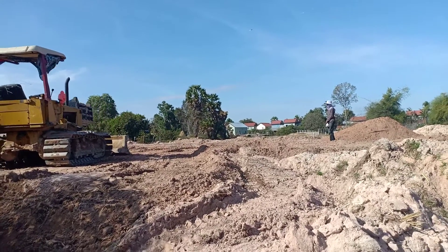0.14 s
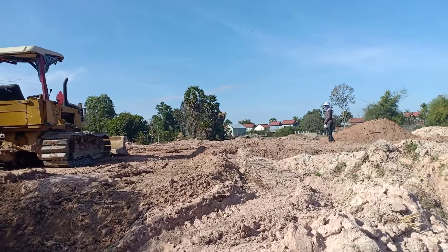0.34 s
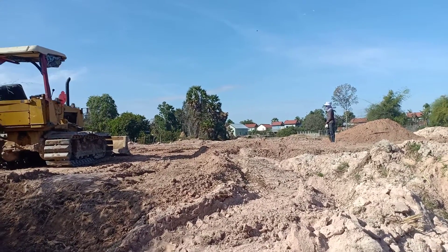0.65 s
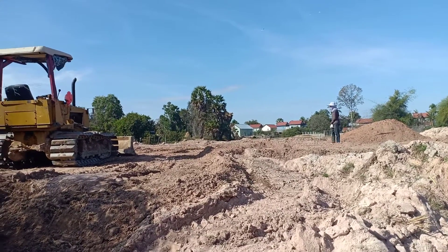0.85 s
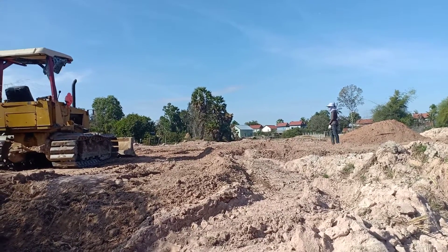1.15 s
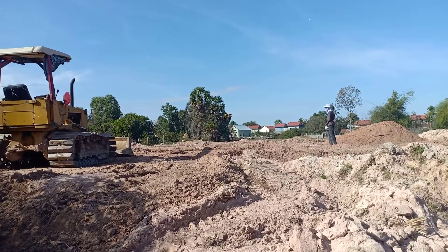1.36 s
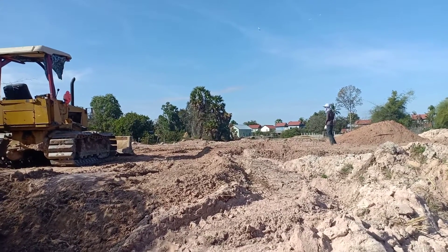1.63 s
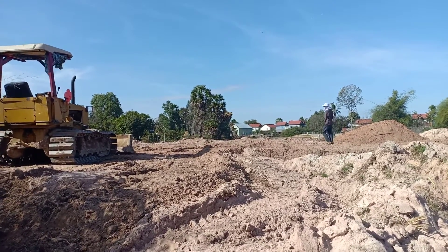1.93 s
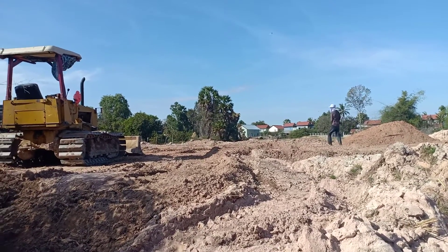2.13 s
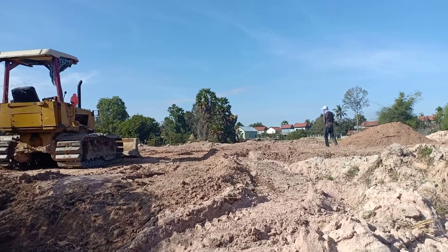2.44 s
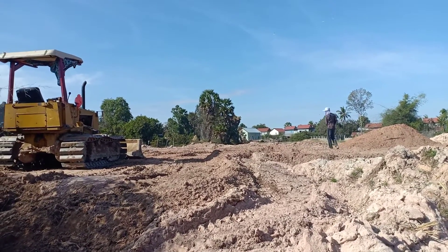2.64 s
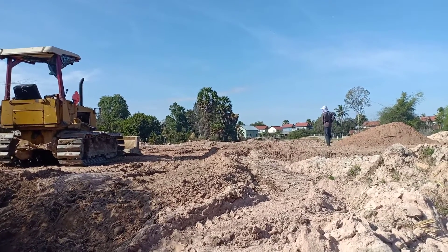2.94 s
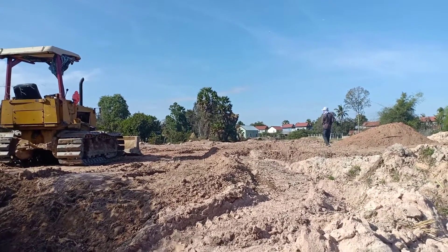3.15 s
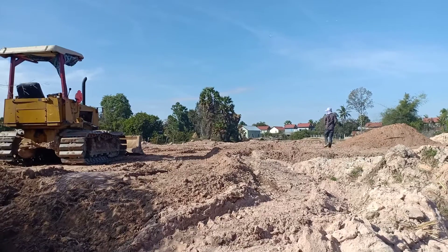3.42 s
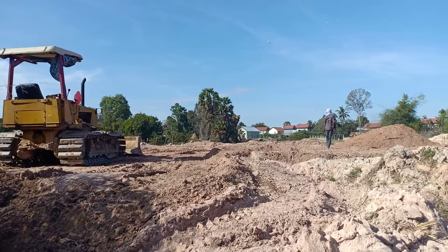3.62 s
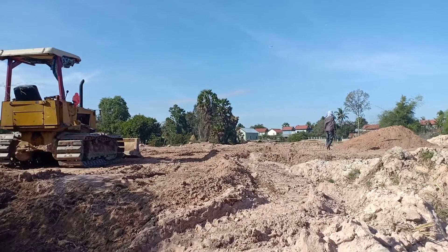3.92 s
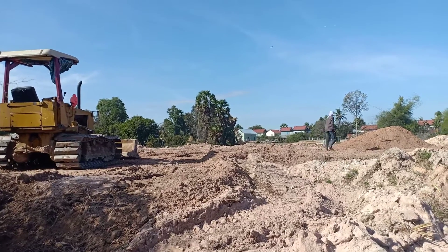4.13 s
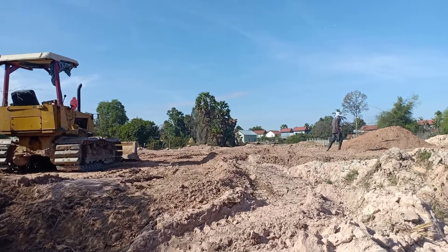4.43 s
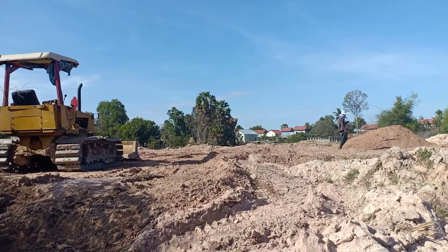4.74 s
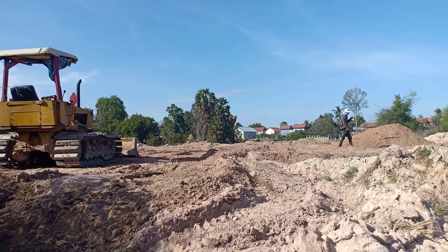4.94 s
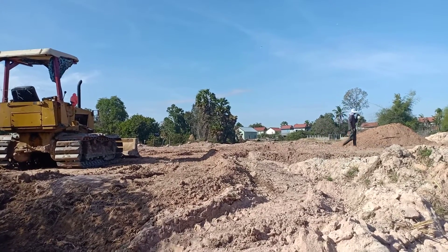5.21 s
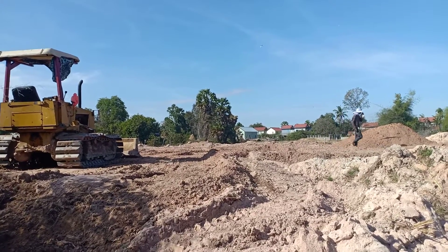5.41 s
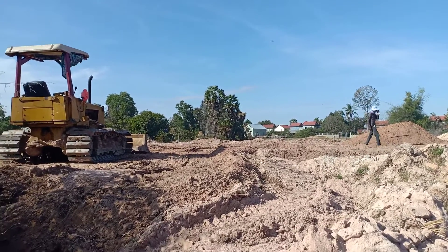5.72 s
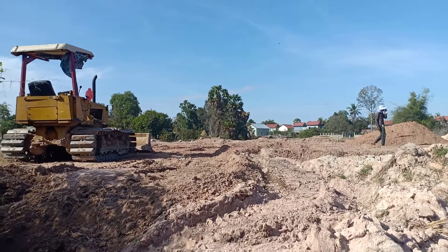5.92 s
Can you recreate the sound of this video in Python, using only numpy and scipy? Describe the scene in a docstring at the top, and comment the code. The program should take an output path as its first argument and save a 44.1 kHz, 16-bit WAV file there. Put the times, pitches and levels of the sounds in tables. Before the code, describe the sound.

Gusty wind rumbles on the microphone over a creeping bulldozer's rattling diesel, clinking metal tracks, brief squeaks and a sudden hiss.

```python
"""From the start a small tracked bulldozer creeps over dirt some way off: its idling diesel clatters, a
cover taps once a cycle and steel links clank, while gusts buffet a phone's two microphone ports, each in
its own way, and drown the bass. Sliding metal squeals in the first two seconds; dry track pins chatter,
loudest near 2.7 s. Just after 4 s the hardest gust rings the right port, then one long hiss bursts out
and leaks away. Lower squeals follow as the tracks clank on."""
import sys
import numpy as np
from scipy.fft import rfft, irfft, next_fast_len
from scipy.io import wavfile
from scipy.ndimage import map_coordinates

SR = 44100
rng = np.random.default_rng(int(sys.argv[2]) if len(sys.argv) > 2 else 0)


def master_out(mix):
    """Clip the mix to full scale and print it as 16-bit PCM to the path in sys.argv[1]."""
    frames = np.transpose(np.atleast_2d(mix))
    ceiling = np.clip(frames, -1, 1)
    pcm = np.round(ceiling * 32767).astype(np.int16)
    wavfile.write(sys.argv[1], SR, pcm)


N = 267731

# machine drive: t/s, engine level/dB, grind level/dB, pin level/dB (all relative)
MACHINE_LEVELS = [(0.0, -49, -49, -52), (0.3, -50, -50.5, -59), (0.75, -49.5, -49, -57),
                  (1.0, -47.5, -47.5, -47), (1.3, -48.5, -47.5, -45), (1.7, -47.5, -47.5, -43.5),
                  (1.98, -44.5, -44, -43), (2.5, -45, -47, -38.5), (2.75, -45, -46, -37),
                  (3.0, -45, -47.5, -41), (3.4, -45.5, -44, -42), (3.9, -46, -48.5, -42.5),
                  (4.3, -46, -48.5, -42.5), (4.9, -47, -48.5, -43.5), (5.2, -45.5, -48, -43.5),
                  (5.46, -47.5, -49, -44.5), (5.71, -46, -49, -44), (6.07, -46.5, -46, -51)]
# engine block spectrum: f/Hz, level/dB
BLOCK_SPECTRUM = [(300, -14), (700, 2), (1100, -1), (1290, -4), (1560, 1.5), (1760, -1), (2100, 3),
                  (2750, -1.5), (3200, -6.5), (3550, -10.5), (4200, -15.5), (6000, -38), (8000, -59)]
# two knocks per cylinder: delay from tap/cycles, relative level/dB
CYLINDER_KNOCKS = [(0.0, 2.5), (.085, 4.5), (.255, 0.5), (.335, 1.5), (.49, -12), (.57, -1.5), (.76, -2),
                   (.84, 3)]
# loose cover modes: f/Hz, level/dB, t60/s
COVER_MODES = [(2130, 0, 0.1), (1903, -2, 0.08), (1730, -11, 0.032), (2550, -13, 0.055)]
def engine():
    """Firings swell the block's clatter; a tap rings the cover and rebounds. Returns sound and beat."""
    first_tap_s, cycle_s, tap_over_engine_db = 0.0575, 0.15023, 16.5
    level_db = curves(MACHINE_LEVELS)[0]
    tap_s = first_tap_s + cycle_s * np.arange(40)
    tap_db = level_db[(tap_s * SR).astype(int)] + tap_over_engine_db + 2 * rng.standard_normal(len(tap_s))
    delay_cycles, cylinder_db = np.transpose(CYLINDER_KNOCKS)
    knock_s = np.concatenate([tap_s + delay * cycle_s for delay in delay_cycles])
    knock_db = np.repeat(cylinder_db, len(tap_s)) + 1.2 * rng.standard_normal(len(knock_s))
    beat = np.hypot(1, blows(knock_s, knock_db + 2.5, t60_s=0.022, attack_s=0.0022))
    clatter = unit(beat * amp(1.36 * wobble(25)) * noise(BLOCK_SPECTRUM, channels=2))
    taps = struck(np.append(tap_s, tap_s + 0.06), np.append(tap_db, tap_db - 6.5),
                  COVER_MODES, spread_db=0.5)
    return amp(level_db + 8) * clatter + taps * [[1], [0.3]], beat


# track plate modes: f/Hz, level/dB, t60/s
PLATE_MODES = [(3680, -8.5, 0.062), (4190, -3.5, 0.056), (4340, -5.5, 0.07), (4406, -2, 0.11),
               (4785, 0, 0.073), (4984, 2, 0.098), (5200, -1, 0.072), (5230, -3, 0.037), (5500, -5, 0.046),
               (5684, 2, 0.063), (5740, -0.5, 0.038), (6440, -7, 0.04)]
def plate_noise(sharpness, flicker_db):
    """Steel noise sounds fitfully through each plate resonance."""
    out = 0
    for hz, db, t60_s in PLATE_MODES:
        flicker = amp(flicker_db * wobble(9))
        out += flicker * filtered(noise(STEEL_SPECTRUM, channels=2), modes([(hz, sharpness / t60_s, db)]))
    return unit(out)


# track steel spectrum at the microphone: f/Hz, level/dB
STEEL_SPECTRUM = [(2000, -19), (3400, -3.5), (4200, -0.5), (4600, -6), (5000, 0), (5800, -3), (6600, -11),
                  (7600, -18.5), (9100, -27.5), (9700, -33), (11200, -24.5), (13600, -24), (14150, -38),
                  (14700, -29), (15400, -45)]
def track_grind(beat):
    """Links grind steadily, shaken by the firings."""
    shake = beat ** 1.64 * amp(0.9 * wobble(14) + 1.96 * wobble(60))
    steel = noise(STEEL_SPECTRUM, channels=2) + 0.74 * plate_noise(sharpness=6.5, flicker_db=3.5)
    return amp(curves(MACHINE_LEVELS)[1] + 5) * unit(shake * steel)


# link landings: t/s, relative level/dB, t60/s, f/Hz
LINK_CLANKS = [(0.0553, -33, 0.045, 4180), (0.1101, -33, 0.11, 5000), (0.1486, -32, 0.074, 4980),
               (0.259, -28, 0.13, 4560), (0.4025, -37, 0.14, 5450), (0.5267, -33, 0.12, 4880),
               (0.8644, -39, 0.11, 5060), (0.9727, -32.5, 0.13, 5230), (1.0026, -44, 0.073, 4920),
               (1.1493, -28, 0.12, 4140), (1.2196, -33, 0.12, 4130), (1.263, -32, 0.15, 5070),
               (1.4795, -35.5, 0.12, 5220), (1.5738, -27.5, 0.11, 5170), (1.6018, -39, 0.073, 4970),
               (1.6731, -31, 0.16, 4300), (1.7554, -35, 0.069, 4150), (1.8367, -27, 0.094, 4980),
               (1.9016, -30.5, 0.097, 5440), (2.0063, -29, 0.12, 4980), (2.1021, -32.5, 0.14, 5210),
               (2.137, -27, 0.14, 5730), (2.3436, -28, 0.2, 5670), (2.4369, -31, 0.14, 5200),
               (2.4743, -31.5, 0.065, 4420), (2.6125, -39, .12, 5080), (2.6584, -31.5, 0.16, 5000),
               (2.7402, -33, 0.21, 5080), (2.7677, -30, 0.2, 5100), (2.9083, -32, 0.14, 5040),
               (3.0584, -29.5, 0.11, 4930), (3.1368, -33, .08, 5800), (3.249, -31, 0.12, 4980),
               (3.3583, -28, 0.1, 5040), (3.372, -24.5, 0.11, 5340), (3.512, -32, 0.1, 5590),
               (3.5882, -36, 0.068, 5830), (3.638, -30, 0.085, 5670), (3.7309, -36, .08, 5470),
               (3.7723, -38, .08, 5700), (3.8272, -26.5, 0.1, 5100), (4.3545, -30, 0.18, 5800),
               (4.5974, -30.5, 0.22, 5000), (4.67, -31.5, 0.12, 5500), (4.8036, -30.5, 0.069, 5670),
               (4.8369, -23.5, 0.14, 5450), (4.8944, -33, 0.15, 5540), (5.048, -33, 0.071, 5460),
               (5.1412, -24, 0.088, 4980), (5.2091, -34, 0.074, 4990), (5.3632, -45, 0.096, 5010),
               (5.4101, -35, .08, 4980), (5.462, -39, 0.097, 4980), (5.7109, -34, 0.2, 5020),
               (5.7982, -35.5, 0.18, 5370), (5.911, -31, 0.076, 5700), (6.047, -26.5, 0.16, 5060)]
# landing spectrum: f/Hz, level/dB
CRASH_SPECTRUM = [(2000, -0.5), (3400, -3), (4300, -9), (5000, -3), (5800, -3), (6600, -4), (7600, -12.5),
                  (9700, -26), (11500, -21), (13600, -31), (14200, -28), (15400, -40)]
def track_clanks():
    """A link lands in a broad crash and bounces, favouring the plate modes near its pitch."""
    favour_db, favour_width_hz, bounce_loss_db_per_s = 7, 210, 230
    times_s, levels_db, t60_s, pitches_hz = np.transpose(LINK_CLANKS)
    metal = unit(noise(CRASH_SPECTRUM, channels=2) + 1.34 * plate_noise(sharpness=4.7, flicker_db=3))
    envelope = blows(times_s, levels_db, t60_s, attack_s=0.0036)
    crash = amp(-2 + 1.4 * wobble(70)) * envelope * metal
    rattle = np.zeros(N)
    for start_s, level_db, pitch_hz in zip(times_s, levels_db, pitches_hz):
        favoured = [(hz, db + favour_db * np.exp(-((hz - pitch_hz) / favour_width_hz) ** 2), ring_s)
                    for hz, db, ring_s in PLATE_MODES]
        bounce_s = np.append(0, rng.uniform(0, 0.03, 4))
        bounce_db = level_db - 19.5 - bounce_loss_db_per_s * bounce_s
        rattle += struck(start_s + bounce_s, bounce_db, favoured, spread_db=4)
    return crash + rattle * [[1], [0.3]]


# frame knocks: t/s, level/dB
FRAME_KNOCKS = [(0.052, -28), (.07, -30), (0.541, -29), (5.468, -35), (5.765, -44)]
# frame spectrum: f/Hz, level/dB
FRAME_SPECTRUM = [(500, -30), (850, 6.5), (1200, 4.5), (1700, -3), (2400, -23), (3500, -51)]
def frame_thuds():
    """Dull knocks of the frame."""
    times_s, levels_db = np.transpose(FRAME_KNOCKS)
    return blows(times_s, levels_db, t60_s=0.079, attack_s=0.00083) * noise(FRAME_SPECTRUM, channels=2)


# track pin resonances, applied twice: f/Hz, width/Hz, level/dB
PIN_MODES = [(2295, 190, -5.5), (2537, 130, 0), (2753, 60, -2)]
def pin_chatter():
    """Dry pins slip at a steady rate, every second slip stronger; heard mostly on the right."""
    slip_hz, depth_db, alternate_db = 57.6, 8, 2
    phase = 2 * np.pi * slip_hz * np.arange(N) / SR + 0.44 * wobble(5.5)
    pulse_db = depth_db * np.cos(phase) + alternate_db * np.cos(phase / 2)
    slips = amp(pulse_db + 0.8 * wobble(130) + 0.9 * wobble(14)) * rng.standard_normal((2, N))
    ringing = unit(filtered(slips, lambda hz: modes(PIN_MODES)(hz) ** 2))
    common, right_only = amp(curves(MACHINE_LEVELS)[2]) * ringing
    return np.array([amp(-25.5) * common, amp(1) * (0.63 * common + 0.52 * right_only)])


# metal squeals: t/s, length/s, f/Hz, level/dB
METAL_SQUEALS = [(0.662, 0.16, 4240, -54), (.97, 0.059, 3540, -50), (0.996, .05, 4200, -50),
                 (1.07, .06, 4200, -47), (1.142, 0.13, 4140, -45), (1.72, 0.16, 4220, -51),
                 (1.902, 0.12, 4300, -47.5), (4.58, 0.18, 2750, -52), (5.099, 0.13, 2735, -47),
                 (5.57, 0.36, 2770, -52), (5.976, .09, 2700, -51)]
def squeals():
    """Metal sliding on metal gives short, unsteady whistles."""
    out = np.zeros(N + SR)
    for start_s, length_s, hz, db in METAL_SQUEALS:
        t = np.arange(round(length_s * SR)) / SR
        swell = np.abs(np.sin(np.pi * t / length_s)) ** 0.28 * amp(db + 1.3 * wobble(44, size=len(t)))
        whistle = np.sin(2 * np.pi * hz * t + 0.55 * wobble(70, size=len(t)))
        out[round(start_s * SR):][:len(t)] += swell * whistle
    return out[:N]


# hiss spectrum: f/Hz, level/dB
HISS_SPECTRUM = [(1500, -24), (2100, -4), (2800, -4), (3700, -8), (4600, -10.5), (5700, 5.5), (6200, 1.5),
                 (6800, -12.5), (8800, -17), (9900, -40), (11300, -19), (13500, -17), (14200, -28),
                 (15000, -38), (15400, -63)]
def hiss():
    """A sudden jet holds briefly and drops; a weaker stream leaks on."""
    start_s, attack_s, hold_s, level_db = 4.1235, 0.0014, 0.035, -19
    jet_fade_db_per_s, leak_fade_db_per_s = 199, 83
    t = np.clip(np.arange(N) / SR - start_s, 0, None)
    fading_s = np.clip(t - hold_s, 0, None)
    jet = amp(-jet_fade_db_per_s * fading_s)
    leak = amp(-8 - leak_fade_db_per_s * fading_s)
    envelope = (1 - np.exp(-t / attack_s)) ** 2 * np.hypot(jet, leak)
    return envelope * amp(level_db + 1.2 * wobble(110)) * noise(HISS_SPECTRUM, channels=2)


# machine, right port against left: f/Hz, level/dB
MACHINE_RIGHT_GAIN = [(800, 0), (2600, -1.5), (4400, -0.5), (5000, -3.5), (6000, -11.5), (7500, -2.5),
                      (12000, -4.5), (14000, 1), (15200, 3)]
# hiss, right port against left: f/Hz, level/dB
HISS_RIGHT_GAIN = [(2000, -4.5), (3500, 1), (4800, -5), (5700, -14), (7000, -8), (8800, -2), (11000, -3),
                   (13200, -12), (14300, 4)]
# likeness of the ports: f/Hz, coherence
PORT_COHERENCE = [(800, 0.98), (2100, 0.73), (2700, 0.4), (4500, 0.93), (5600, 0.46), (7000, 0.54),
                  (14000, 0.28)]
# lead of the right port: f/Hz, lead/ms
RIGHT_LEAD = [(1000, 0.2), (2400, 0.2), (3000, .16), (4600, 0.17), (5500, 0.14), (7000, 0.17),
              (9000, 0.201)]
def at_ports(pair, right_gain):
    """The left port hears pair[0]; the right hears it earlier, coloured and blended with pair[1]."""
    def right_path(hz):
        angle = np.arccos(np.clip(along(PORT_COHERENCE, hz), 0, 1))
        lead = np.exp(2j * np.pi * hz * along(RIGHT_LEAD, hz) / 1000)
        return amp(along(right_gain, hz)) * lead * [np.cos(angle), np.sin(angle)]
    return np.array([pair[0], filtered(pair, right_path).sum(axis=0)])


# wind on the left port: t/s, flutter level/dB, rumble level/dB (both relative)
GUSTS_LEFT = [(0.0, -25.5, -19.5), (0.12, -25, -23.5), (0.28, -22, -21.5), (0.36, -28, -19),
              (0.52, -24.5, -24.5), (0.6, -23.5, -20.5), (1.0, -29.5, -26), (1.28, -25, -25.5),
              (1.36, -30, -28), (1.52, -19, -20.5), (1.6, -21.5, -21), (1.7, -21.5, -17), (1.74, -21, -23),
              (1.84, -18.5, -24), (2.04, -25, -21), (2.2, -36, -30), (2.24, -25, -29), (2.32, -28, -24.5),
              (2.52, -24.5, -22.5), (2.6, -26.5, -24), (2.72, -28.5, -20), (2.8, -27, -20),
              (2.88, -33, -23.5), (2.92, -23.5, -17.5), (3.08, -31.5, -27.5), (3.16, -21, -21.5),
              (3.36, -21.5, -20), (3.48, -35.5, -32.5), (3.6, -27, -24.5), (3.72, -31, -26.5),
              (3.84, -25, -18.5), (3.92, -31, -26), (4.12, -25, -20.5), (4.28, -27, -23),
              (4.32, -30.5, -28), (4.56, -32.5, -27), (4.6, -28, -26), (4.72, -32.5, -28.5),
              (4.84, -24.5, -20), (5.0, -31.5, -31), (5.32, -32, -32.5), (5.4, -34, -34.5),
              (5.6, -28, -25.5), (5.68, -32, -30), (5.8, -21.5, -21), (5.84, -28, -23), (5.96, -25, -19),
              (6.07, -26.5, -28)]
# wind on the right port: t/s, flutter level/dB, rumble level/dB (both relative)
GUSTS_RIGHT = [(0.0, -29.5, -20), (0.12, -26, -19), (0.24, -30, -23.5), (0.52, -33.5, -29),
               (0.72, -30, -27), (0.76, -39, -32.5), (0.96, -33.5, -28), (1.04, -36, -31.5),
               (1.32, -35, -28), (1.44, -35, -32), (1.76, -32, -27), (1.84, -28, -23), (1.96, -33, -32.5),
               (2.56, -36, -29), (2.72, -35, -30.5), (2.84, -37, -31), (2.92, -26.0, -23), (3.08, -37, -34),
               (3.16, -25, -22), (3.32, -25.5, -25), (3.4, -33.5, -32), (3.48, -30.5, -36), (3.6, -37, -29),
               (3.68, -28.5, -27), (3.96, -36, -31), (4.04, -25.5, -25.5), (4.12, -20, -27),
               (4.16, -30, -29), (4.32, -28.5, -21.5), (4.44, -26, -24), (4.56, -32, -29.5),
               (4.72, -29.5, -26.5), (4.8, -33, -30), (4.92, -28, -33), (5.0, -38, -33.5), (5.16, -35, -32),
               (5.24, -30.5, -25.5), (5.36, -28, -25), (5.4, -29.5, -24), (5.56, -31, -26.5),
               (5.6, -34, -29), (5.72, -26, -22), (5.8, -31.5, -33), (5.88, -30, -21.5), (6.0, -32, -30),
               (6.07, -24.5, -16)]
# rumble spectrum: f/Hz, level/dB
RUMBLE_SPECTRUM = [(15, -70), (25, -48), (45, -26), (80, 0.5), (130, 5.5), (220, 1.5), (350, -10),
                   (600, -70.5)]
# flutter spectrum: f/Hz, level/dB
FLUTTER_SPECTRUM = [(150, -12), (280, -1), (450, -6.5), (700, -18), (1100, -27), (1700, -36.5), (3000, -63),
                    (6000, -120)]
def port_wind(gusts, spiky_db):
    """Eddies roll over a port as lumpy rumble and spikier flutter; strong flow brightens, then chokes."""
    swell_db, edge_hz, edge_width_hz, choke_amplitude = 0.64, 732, 500, 0.47
    flutter_db, rumble_db = np.array(curves(gusts)) + swell_db * np.array([wobble(12), wobble(11)])
    lumps = wobble(30) + 0.74 * wobble(80)
    rumble = unit(amp(1.92 * lumps) * noise(RUMBLE_SPECTRUM, channels=1)[0])
    flutter = unit(amp(1.05 * lumps + spiky_db * wobble(110)) * noise(FLUTTER_SPECTRUM, channels=1)[0])
    edge_db = -7.5 + 0.94 * (flutter_db + 30)
    edge = amp(edge_db) * filtered(flutter, modes([(edge_hz, edge_width_hz, 0)]))
    flow = amp(rumble_db + 1.5) * rumble + amp(flutter_db - 1.5) * (flutter + edge)
    return soft_limit(flow, choke_amplitude, hardness=4)


# loudest eddies: t/s, level/dB, f/Hz, port (0 left, 1 right)
LOUD_POPS = [(0.089, -22, 280, 1), (0.26, -20, 348, 1), (0.302, -10, 550, 1), (0.273, -2, 376, 0),
             (0.379, -5.5, 520, 0), (0.575, -6, 415, 0), (1.231, -3.5, 470, 0), (1.302, -2.5, 448, 0),
             (1.312, -9, 325, 1), (1.474, -7, 520, 0), (1.49, -6, 430, 0), (1.535, -4, 477, 0),
             (1.558, -6, 566, 0), (1.662, -6.5, 420, 0), (1.673, -6, 605, 0), (1.706, -2, 640, 0),
             (1.803, -5, 560, 0), (1.852, -6, 600, 0), (1.834, -9, 395, 1), (2.5, -5.5, 380, 0),
             (2.784, -8.5, 326, 0), (2.922, -1.5, 590, 1), (2.935, -5.5, 304, 0), (2.999, -3.5, 327, 0),
             (3.148, -2.5, 423, 0), (3.149, -4, 240, 1), (3.179, 1.5, 260, 1), (3.192, 0, 273, 1),
             (3.278, -1.5, 550, 0), (3.306, -2.5, 360, 0), (3.489, -8, 380, 1), (3.7, -2.5, 360, 1),
             (3.826, -7, 372, 0), (4.059, -1.5, 480, 1), (4.0745, 5, 430, 1), (4.092, -1, 810, 1),
             (4.254, -4.5, 320, 0), (4.311, -6, 426, 1), (4.458, -4.5, 370, 1), (4.611, -3.5, 246, 0),
             (4.727, -6.5, 358, 1), (4.841, -6, 350, 0), (5.216, -10, 406, 1), (5.226, -6, 300, 1),
             (5.289, -10, 332, 1), (5.296, -4, 337, 1), (5.438, -5.5, 297, 1), (5.527, -4, 500, 1),
             (5.553, -5.5, 593, 1), (5.583, -1.5, 316, 0), (5.673, -4.5, 357, 1), (5.728, -1, 625, 1),
             (5.79, -1, 390, 0), (5.951, -10, 307, 1), (5.955, 0, 282, 0)]
def eddy_pops():
    """An eddy bursts on a port: a blunt push of either sign with a few ragged cycles on top."""
    push_corner_hz, ring_cycles, stretch_per_db = 480, 8.96, 0.036
    out, t = np.zeros((2, N + SR)), np.arange(SR // 16) / SR
    rise = np.sin(np.pi / 2 * np.clip(t / 0.0027, 0, 1)) ** 2
    pops = np.vstack([LOUD_POPS, small_pops(GUSTS_LEFT, port=0, count=20),
                      small_pops(GUSTS_RIGHT, port=1, count=30)])
    for (start_s, db, hz, port), sign in zip(pops, rng.choice([-1, 1], len(pops))):
        cycles = np.sin(2 * np.pi * hz * t + 1.34 * wobble(203, size=len(t)))
        push = 1.42 * min(1, (push_corner_hz / hz) ** 3) * np.sin(np.pi * hz * t)  # octave below
        t60_s = np.clip(ring_cycles / hz * (1 + stretch_per_db * db), 0.01, 0.1)
        envelope = rise * amp(db - 60 * t / t60_s)
        out[round(port), round(start_s * SR):][:len(t)] += sign * envelope * (cycles + push)
    return out[:, :N]


def small_pops(gusts, port, count):
    """Pop rows for small eddies at random times, scaled by the wind on their port."""
    when, weakness, pitch = rng.uniform(size=(count, 3)).T
    wind_db = curves(gusts)[0][(when * (N - 1)).astype(int)]
    level_db = wind_db + 11.5 - 8 * weakness
    pitch_hz = 344 * 1.5 ** (pitch - 0.5)
    return np.transpose([when * N / SR, level_db, pitch_hz, np.full(count, port)])


# right port modes: f/Hz, level/dB, t60/s
PORT_MODES = [(214, -1.5, 0.052), (415, -12, .04), (606, 2, 0.07), (794, -7, 0.083), (1520, -17, 0.034)]
def port_thump():
    """The hardest gust sets the right port ringing."""
    return [[0], [1]] * struck(times_s=[4.0775], levels_db=[-2.5], table=PORT_MODES, spread_db=0)


# spectrum of the largest eddies: f/Hz, level/dB
SURGE_SPECTRUM = [(15, -70), (25, -42), (45, -5.5), (75, 2), (110, -2.5), (160, -19), (300, -70.5)]
def wind_surge():
    """The largest eddies cover both ports and follow their mean rumble level."""
    mean_db = (curves(GUSTS_LEFT)[1] + curves(GUSTS_RIGHT)[1]) / 2
    common, *separate = noise(SURGE_SPECTRUM, channels=3)
    return amp(mean_db - 5) * unit(0.5 * common + np.array(separate))


def struck(times_s, levels_db, table, spread_db):
    """Each blow rings the modes, slightly detuned, their levels scattered by spread_db."""
    out, t = np.zeros(N + SR), np.arange(SR // 8) / SR
    hz, mode_db, t60_s = np.transpose(table)[..., None]
    envelope = amp(mode_db - 60 * t / t60_s) * (1 - np.exp(-t / 0.00066))
    for start_s, db in zip(times_s, levels_db):
        scatter, detune = rng.standard_normal((2, len(table), 1))
        ring = amp(db + spread_db * scatter) * envelope * np.sin(2 * np.pi * hz * (1 + 0.0087 * detune) * t)
        out[round(start_s * SR):][:len(t)] += ring.sum(axis=0)
    return out[:N]


def blows(times_s, levels_db, t60_s, attack_s):
    """Envelope of decaying blows, summed in power."""
    power, t = np.zeros(N + SR), np.arange(SR // 6) / SR
    rise = (1 - np.exp(-t / attack_s)) ** 2
    for start_s, db, fade_s in np.broadcast(times_s, levels_db, t60_s):
        power[round(start_s * SR):][:len(t)] += amp(2 * db - 120 * t / fade_s) * rise
    return np.sqrt(power[:N])


def modes(table):
    """Causal response of resonances given as f/Hz, width/Hz, level/dB."""
    return lambda f: sum((-1) ** k * amp(db) * 1j * f * width / (hz * hz - f * f + 1j * f * width)
                         for k, (hz, width, db) in enumerate(table))


def noise(spectrum, channels):
    """Independent noises of one colour, rms 1."""
    return unit(filtered(rng.standard_normal((channels, N)), lambda hz: amp(along(spectrum, hz))))


def filtered(x, response):
    """Apply a complex frequency response."""
    size = next_fast_len(N + SR // 2)
    return irfft(rfft(x, size) * response(np.fft.rfftfreq(size, 1 / SR)), size)[..., :N]


def wobble(rate_hz, size=N):
    """Smooth random curve with knots at rate_hz."""
    knots = rng.standard_normal(int(size * rate_hz / SR) + 4)
    return map_coordinates(knots, [np.arange(size) * rate_hz / SR])


def curves(rows):
    """Per-sample curve of each column after t/s."""
    times_s, *columns = np.transpose(rows)
    return [np.interp(np.arange(N) / SR, times_s, column) for column in columns]


def along(points, hz):
    """Interpolate on a log frequency axis."""
    points_hz, values = np.transpose(points)
    return np.interp(np.log(hz + 1), np.log(points_hz + 1), values)


def soft_limit(x, ceiling, hardness):
    return x / (1 + np.abs(x / ceiling) ** hardness) ** (1 / hardness)


def amp(db):
    return 10 ** (np.asarray(db) / 20)


def unit(x):
    return x / np.sqrt(np.mean(x ** 2) + 1e-20)


def scene():
    """Bulldozer and wind at the two ports."""
    motor, beat = engine()
    body = motor + track_grind(beat) + track_clanks() + frame_thuds() + squeals()
    bulldozer = at_ports(body, MACHINE_RIGHT_GAIN) + pin_chatter() + at_ports(hiss(), HISS_RIGHT_GAIN)
    wind = np.array([port_wind(GUSTS_LEFT, spiky_db=2), port_wind(GUSTS_RIGHT, spiky_db=3)])
    return bulldozer + wind + wind_surge() + eddy_pops() + port_thump()


def record(dry):
    """The phone cuts the deepest bass, rounds off the loudest gusts and limits the band."""
    low_cut_hz, top_hz = 45, 15450
    lean = filtered(dry, lambda hz: (1j * hz / (low_cut_hz + 1j * hz)) ** 2)
    rounded = soft_limit(lean, ceiling=0.92, hardness=6)
    return filtered(rounded, lambda hz: hz < top_hz)


dry = scene()
out = record(dry)
master_out(out)
```